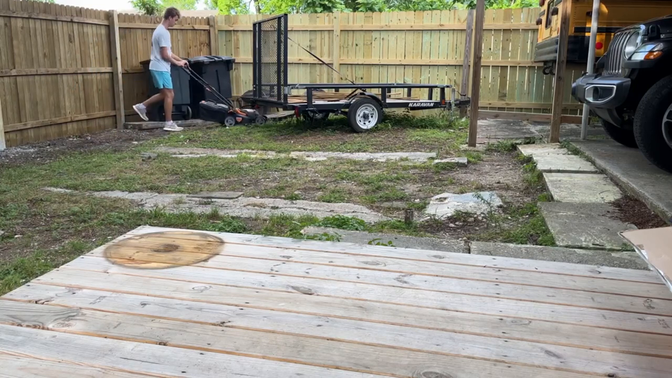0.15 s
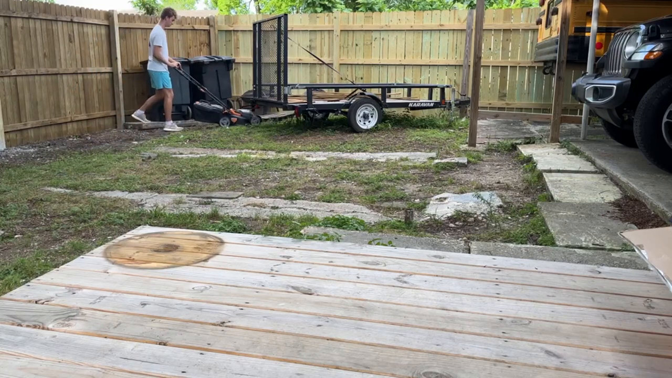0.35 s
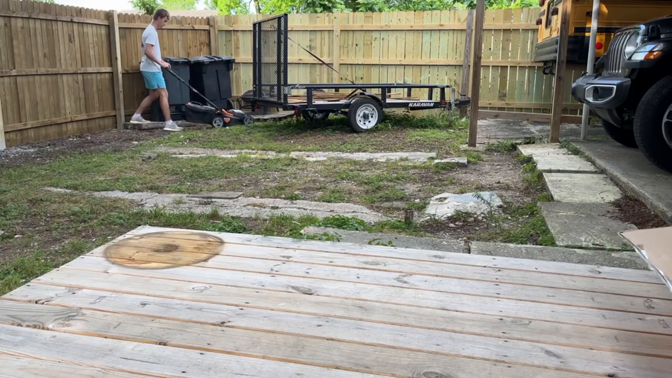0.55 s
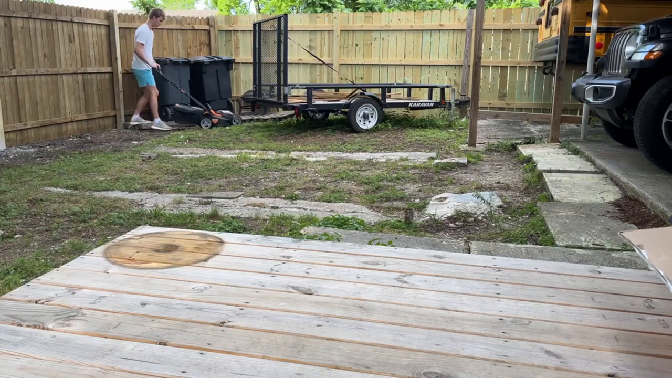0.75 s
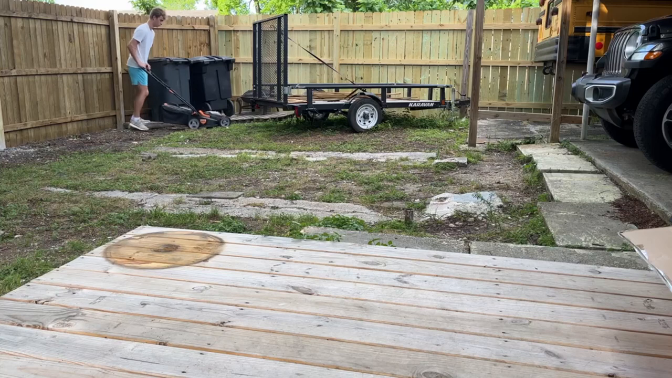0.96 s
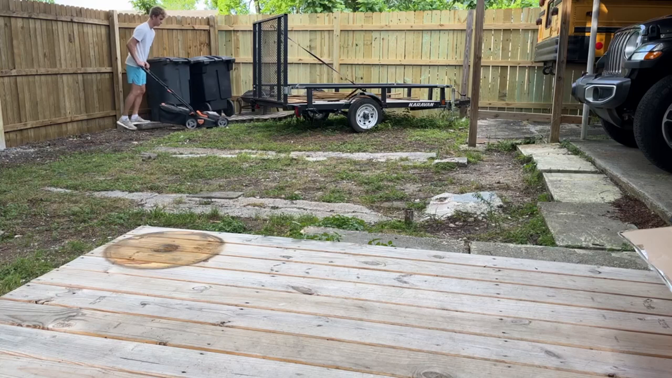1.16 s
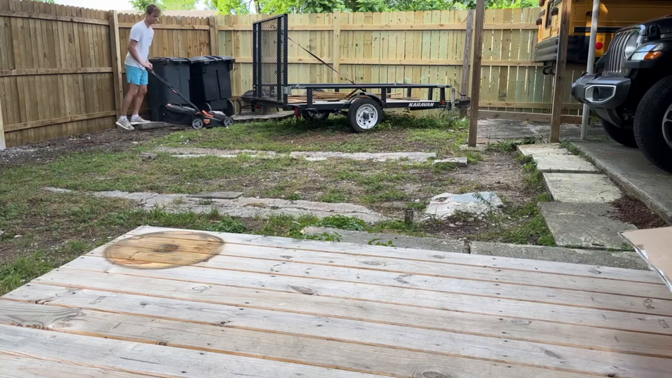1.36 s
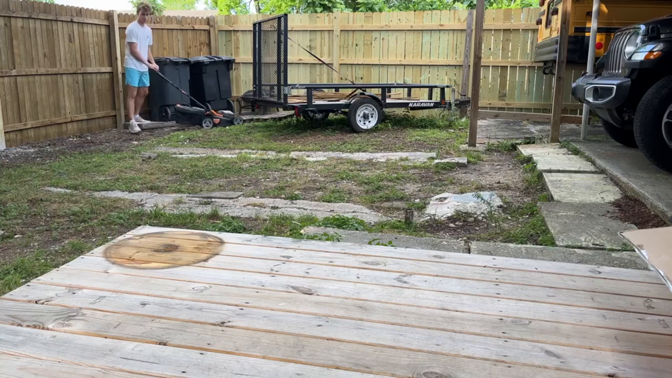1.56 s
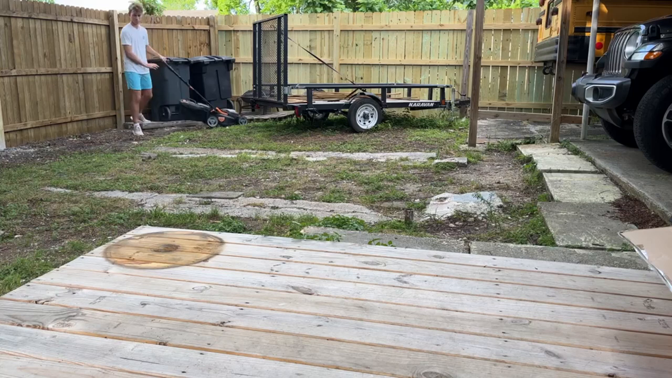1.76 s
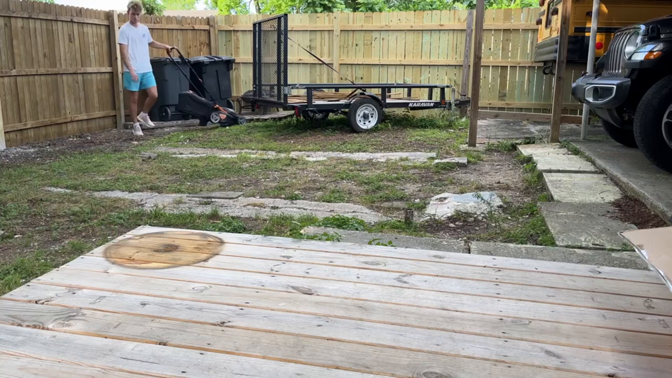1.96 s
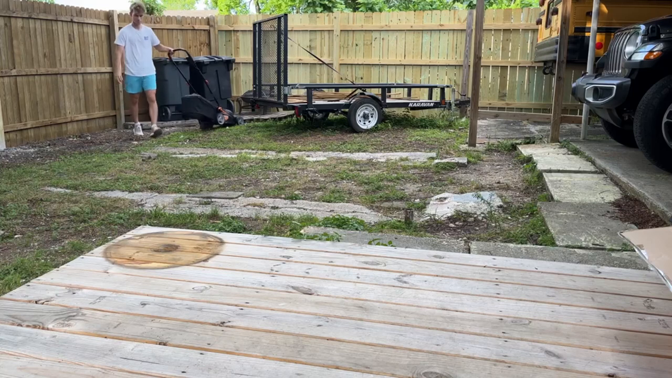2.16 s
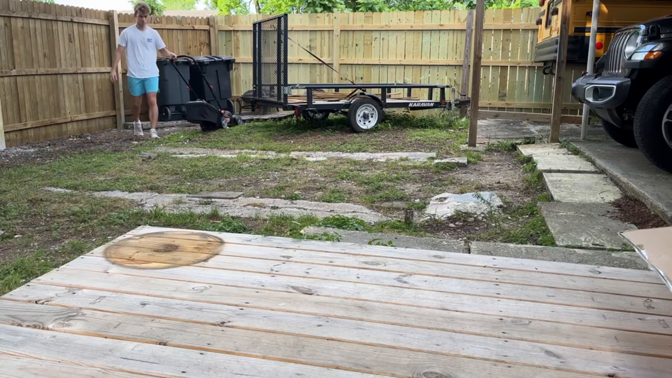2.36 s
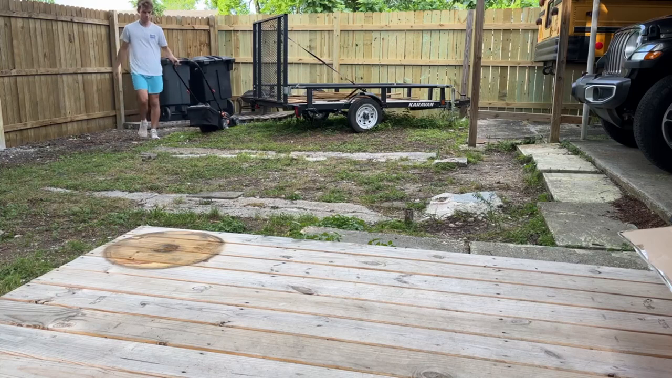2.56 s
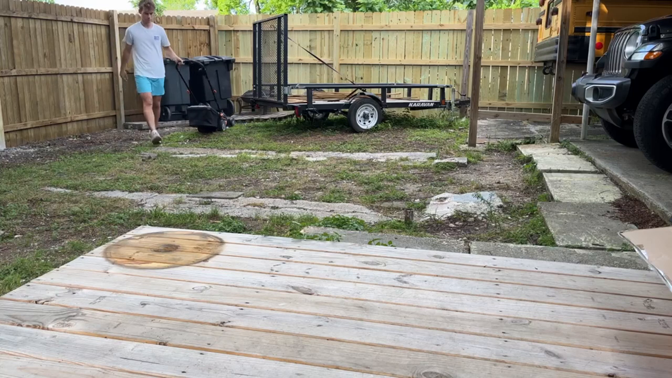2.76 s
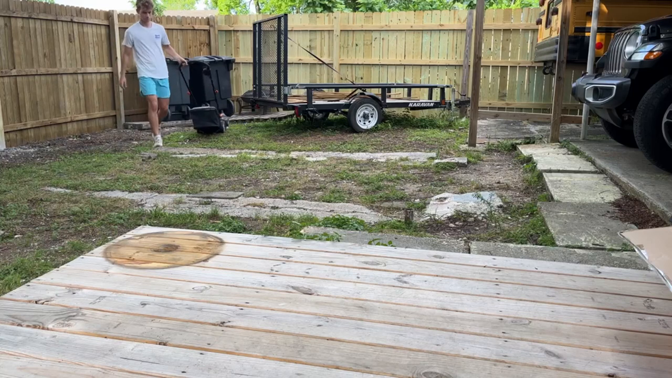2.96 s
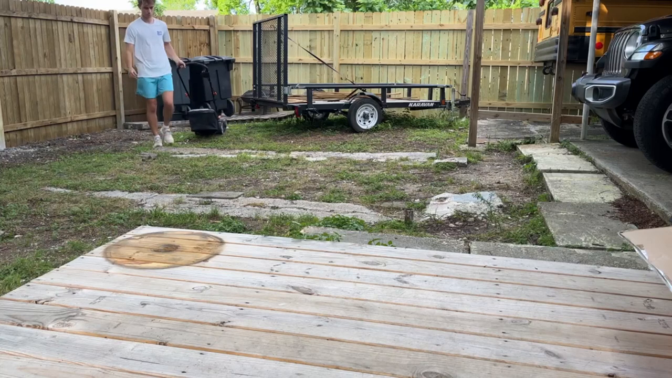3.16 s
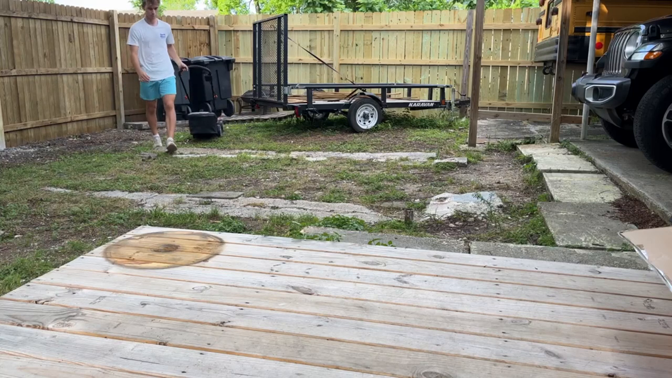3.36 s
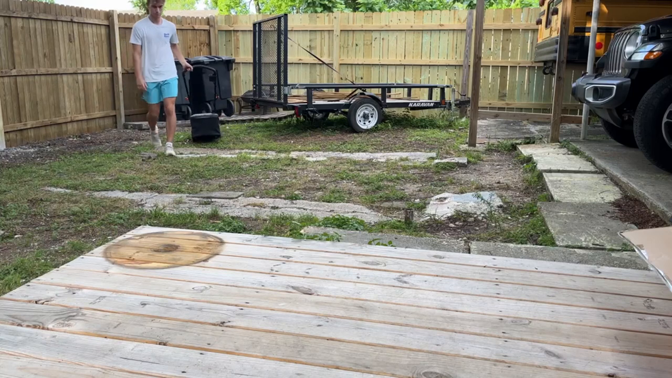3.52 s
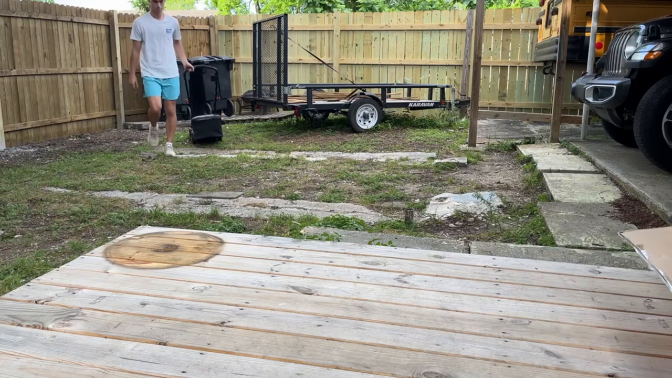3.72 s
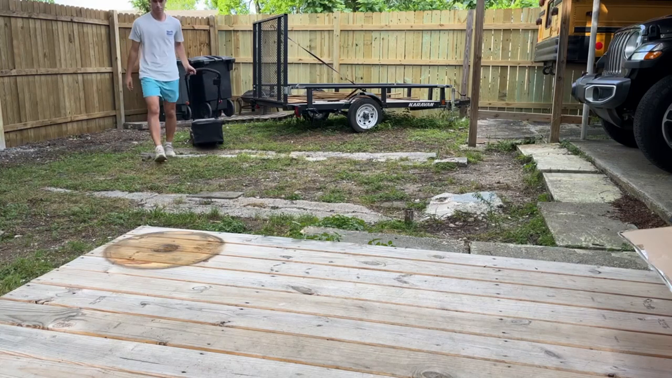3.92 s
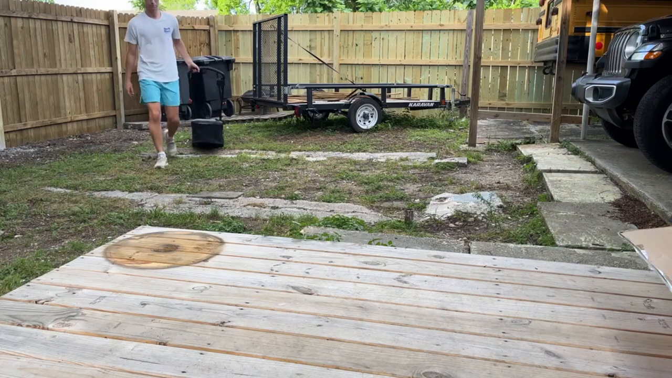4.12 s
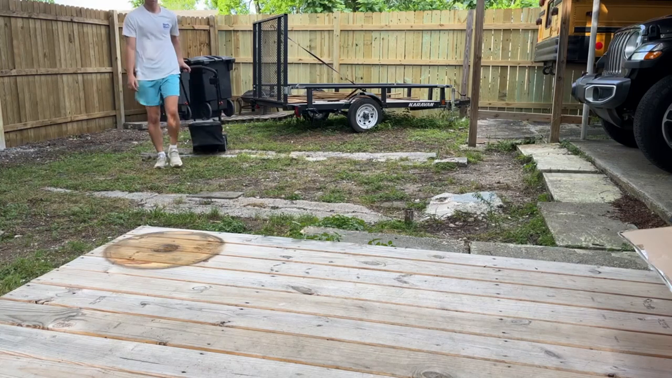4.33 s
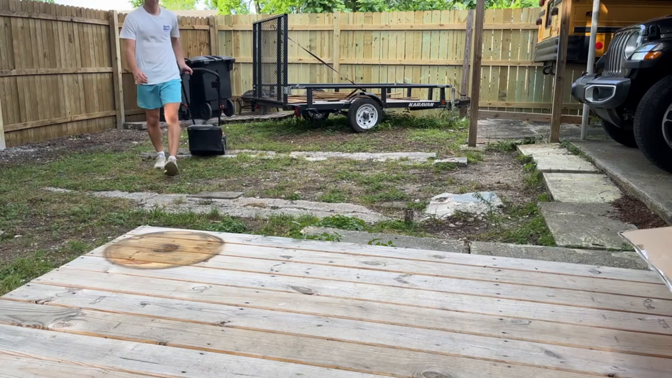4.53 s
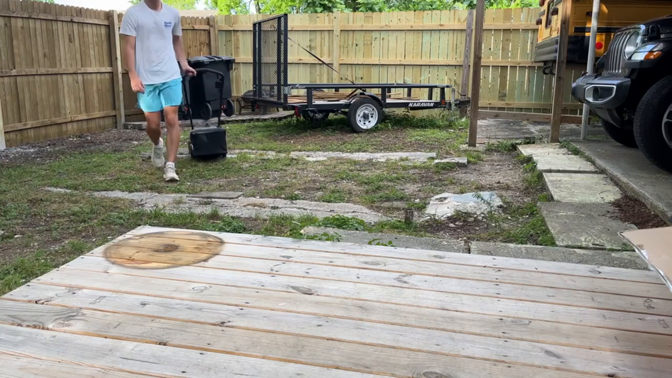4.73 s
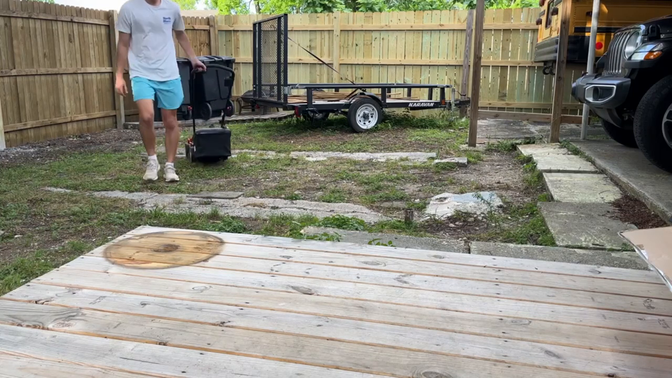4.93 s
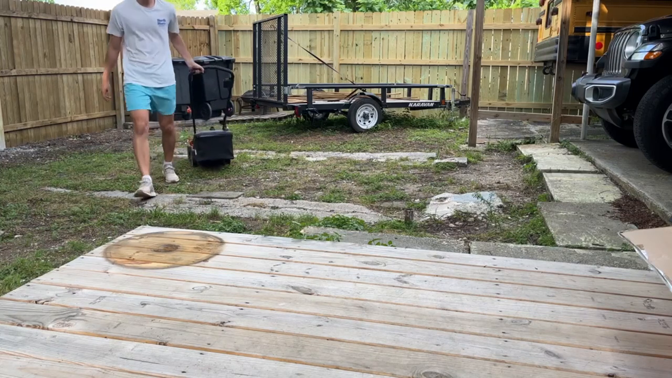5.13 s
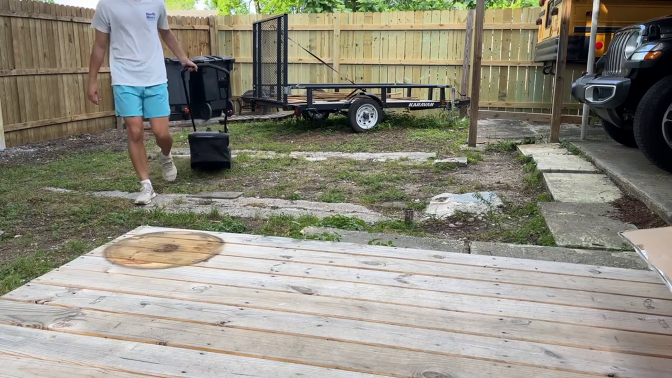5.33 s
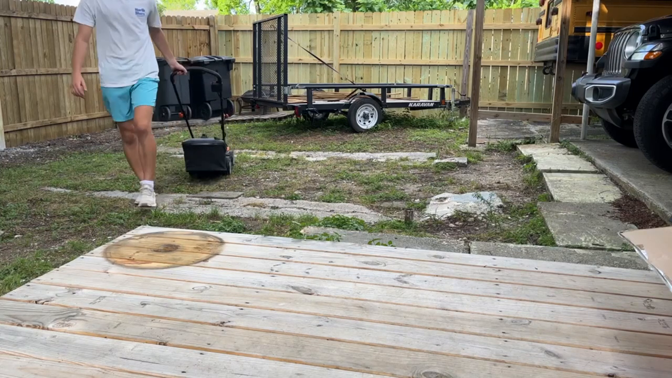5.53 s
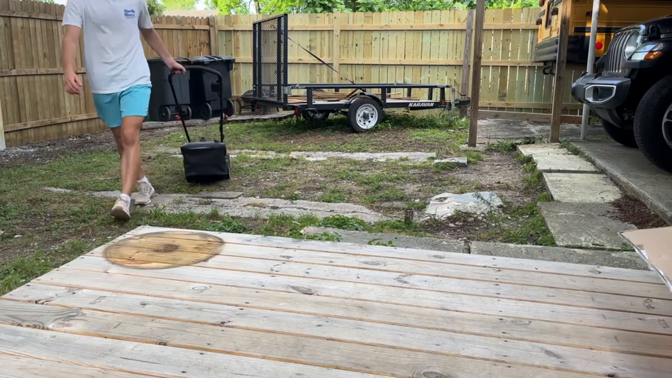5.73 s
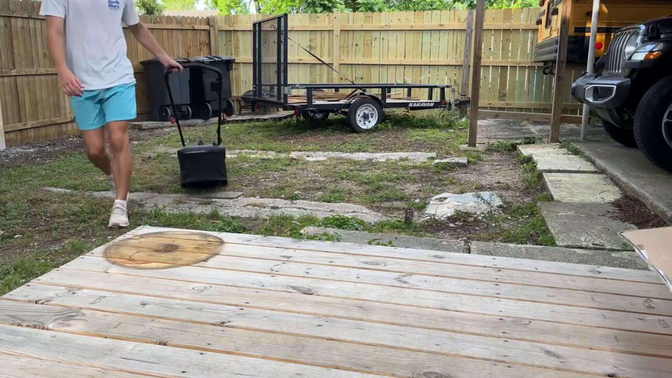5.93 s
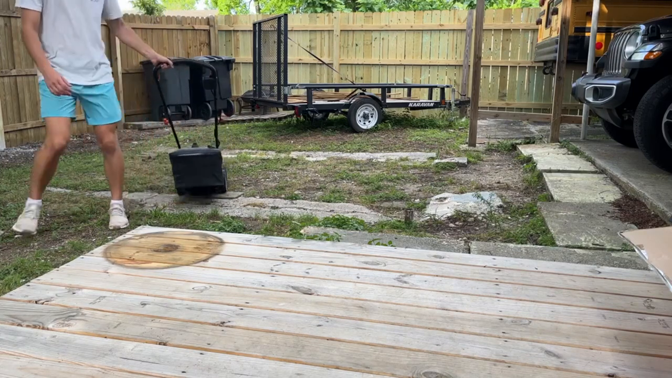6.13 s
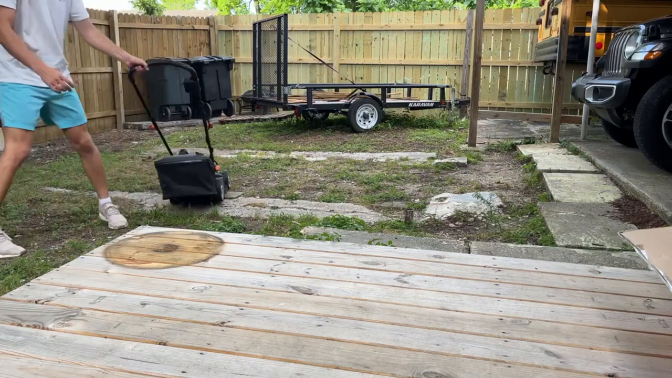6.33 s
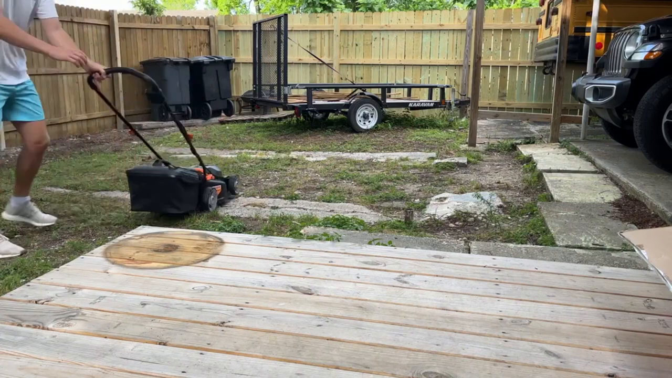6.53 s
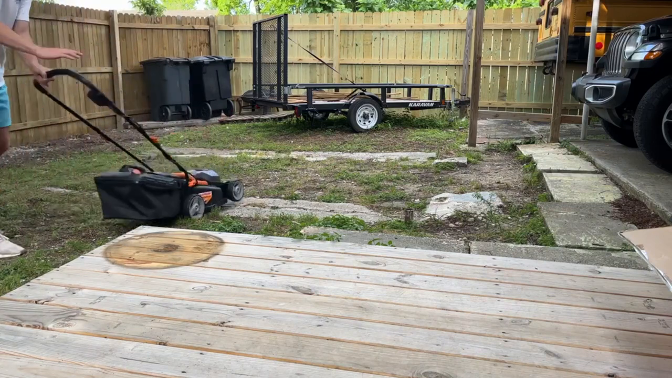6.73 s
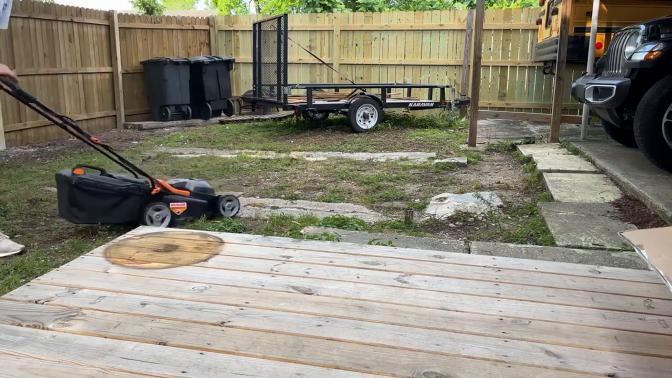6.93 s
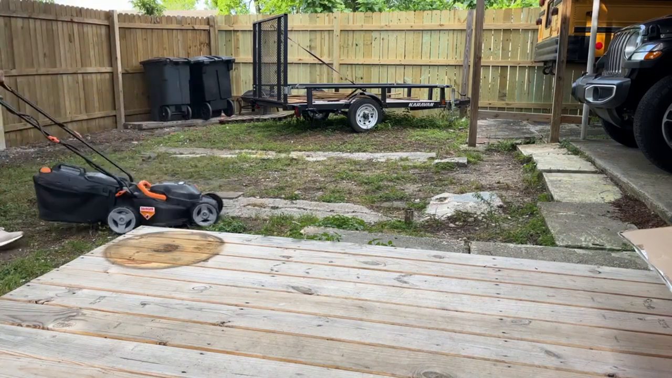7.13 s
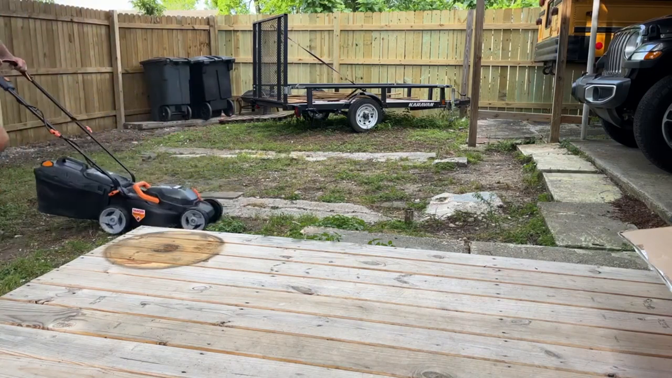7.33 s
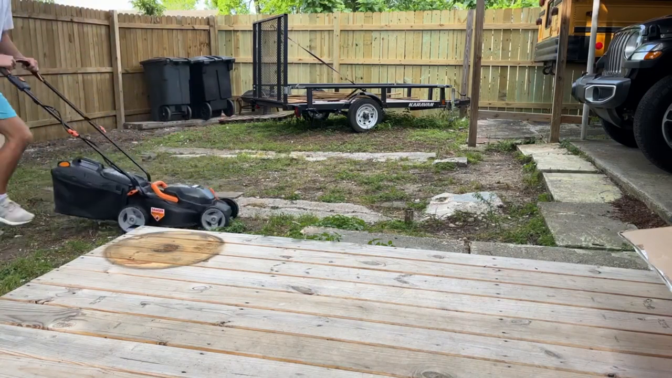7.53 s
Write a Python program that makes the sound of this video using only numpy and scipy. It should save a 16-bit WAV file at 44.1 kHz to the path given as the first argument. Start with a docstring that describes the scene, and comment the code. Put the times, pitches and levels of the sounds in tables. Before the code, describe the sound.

A small electric mower runs in a fenced backyard, heard from a fixed microphone on a deck. Its clean mid-low whine starts faint and distant, swells as it turns and is wheeled nearer, wavering and briefly dipping. Airy roar and fine grass hiss grow with it. Hollow plastic knocks multiply, a hard grit crack marks the closest pass, then loose joints rattle as the motor eases slightly.

```python
"""A motor whines on one clean note as a battery lawn mower is pushed about a fenced yard, far at first, then close.
The blade thrums and stirs the air under the plastic deck: sines at one fixed speed ratio, and coloured noise.
Cut grass hisses, grit and tufts snap, the deck knocks on uneven ground: shaped noise. The whirr swells grainily,
and the handle rattles late on in short notes. Left and right carry the treble at different phases."""
import sys
import numpy as np
from scipy import signal
from scipy.fft import rfft, irfft, next_fast_len
from scipy.io import wavfile
from scipy.ndimage import uniform_filter1d, map_coordinates

SR = 44100
rng = np.random.default_rng(int(sys.argv[2]) if len(sys.argv) > 2 else 0)


def attenuation_scalar(level_db):
    """Turn a level in dB into a linear amplitude multiplier (20 dB per decade)."""
    decades = np.asarray(level_db, float) / 20
    return 10 ** decades


def transcribe(signal):
    """Save signal, clipped to [-1, 1], as a 16-bit WAV file at the path in sys.argv[1]."""
    frames = np.atleast_2d(signal).T
    limited = np.clip(frames, -1, 1)
    pcm = np.round(limited * 32767).astype(np.int16)
    wavfile.write(sys.argv[1], SR, pcm)


N = 334278  # samples

# Levels are those ahead of the stereo image. Spectra give only a shape.
# motor speed, before a slight waver: [t/s, whine f/Hz]
MOTOR_SPEED = [(0, 267.5), (1.1, 267.4), (1.3, 270.2), (2.05, 271.2), (3.67, 271.2), (4.1, 269.2),
               (4.4, 270.2), (6.1, 270.3), (6.3, 268.8), (7.58, 267.3)]
WHINE_CYCLES_PER_BLADE = 2.566  # whine cycles for each blade passage, as if through a gear or belt
# overtones of the motor: [multiple of the whine, relative level/dB]
WHINE_ORDERS = [(1, -0.5), (2, -19)]
# motor note, rising and falling, loudest at 6.4 s: [t/s, level/dB]
WHINE_LEVEL = [(0, -38), (.6, -38.5), (1.82, -41), (2.2, -29.5), (3.67, -31), (4.05, -38), (4.72, -29),
               (5.3, -29.5), (5.72, -27.5), (6.06, -28), (6.4, -24), (7.16, -31), (7.58, -35)]
# faint overtones of the blade: [multiple of the blade passage, rms level/dB]
BLADE_LINES = [(2, -57), (4.08, -54), (6, -53)]
# how far the deck is turned side-on to the microphone: [t/s, share 0-1]
SIDE_ON = [(0, 0.76), (1.9, 0.9), (2.15, 0.88), (2.42, 0), (3.4, 0.04), (3.75, 0.71), (4.47, 0.7),
           (4.8, 0.56), (6.06, 0.65), (6.4, 0.8), (6.72, 0.79), (7, 1)]
THRUM_DB, THRUM_SIDE_DB = -65.5, 25  # end-on; change when side-on
# a note fades for a moment, as if its echo from the fence cancelled it; the sign of a loss is ignored:
# [middle t/s, half width/s, whine loss/dB, thrum loss/dB]
FADES = [(1.08, 0.24, 10, -1), (4.2, 0.074, 1.5, 13), (4.61, 0.097, 0.5, -6), (5, 0.063, 4, 5),
         (5.47, 0.09, 6.5, -1), (6.22, 0.11, 7, 1), (6.5, 0.092, 4, 16)]

# distance: the mower comes nearer, heard in the deck roar: [t/s, level/dB]
NEARNESS = [(0, -41), (1.86, -39), (3.3, -39), (4.05, -35.5), (4.71, -34), (5.34, -33), (6.25, -31),
            (6.48, -28.5), (6.97, -32.5), (7.58, -34)]
# spectrum of the deck roar: [f/Hz, level/dB per Hz]
ROAR_SPECTRUM = [(100, -16), (140, -12.5), (250, -9), (288, 0), (376, -4), (606, -4), (773, -8.5),
                 (1560, -13), (1700, -19.5), (2200, -37)]
# low body of the deck: [f/Hz, level/dB per Hz]
DRONE_SPECTRUM = [(130, -40), (175, -19), (210, 1), (300, -2.5)]
# resonance of the air under the deck: [f/Hz, width/Hz, level/dB]
CAVITY = [(321.2, 18, 0)]
CAVITY_DB = -45  # it sings faintly under the roar
# resonances of the fan housing: [f/Hz, width/Hz, level/dB]
HOUSING = [(1763, 300, 3.1), (2200, 71, 6.2), (2410, 110, 3.8), (2692, 92, 6.8)]
# whirr end-on at mid distance; change when side-on; share of the roar's swing that it follows
WHIRR_DB, WHIRR_SIDE_DB, WHIRR_FOLLOWS = -45, 2, 0.67

# how much grass the blade meets, as fine hiss: [t/s, level/dB]
GRASS_CUT = [(0, -51), (.38, -48.5), (1.46, -53), (2.55, -54), (3.8, -48.5), (4.48, -46), (5.07, -49),
             (6.1, -47.5), (6.46, -40.5), (6.56, -45.5), (6.95, -45), (7.58, -49.5)]
# spectrum of the fine hiss: [f/Hz, level/dB per Hz]
HISS_SPECTRUM = [(5000, -82), (7000, 6.5), (10000, 1.5), (14500, -2), (15400, -45)]
# spectrum of the coarse swish: [f/Hz, level/dB per Hz]
SWISH_SPECTRUM = [(1000, -12), (2800, 2.5), (4500, -4), (6500, -6.5), (8000, -65)]
SWISH_DB, SWISH_WITH_CUT, SWISH_WITH_NEAR = -45.5, 0.57, 0.079  # level; shares of the two swings it follows

# spectrum of wheels and far traffic: [f/Hz, level/dB per Hz]
RUMBLE_SPECTRUM = [(20, -37), (35, -12.5), (58, -2.5), (80, -5), (130, -7), (200, -27)]
RUMBLE_DB = -49.5

# grit cracks on the blade: [start t/s, envelope level/dB]
GRIT = [(.689, -32.5), (.781, -30), (1.434, -34), (1.621, -29), (2.331, -31.5), (2.854, -32),
        (3.254, -34.5), (3.357, -30.5), (4.348, -29), (5.247, -33), (5.606, -31), (5.7, -34), (6.381, -37),
        (6.484, -14.5), (6.867, -29), (7.053, -26), (7.225, -34)]
GRIT_S = 0.009  # time to lose 20 dB
# tufts tear at the blade: [middle t/s, level/dB, half length/s]
TUFTS = [(0.754, -33, 0.017), (0.799, -30, 0.013), (0.834, -36, 0.035), (1.623, -31.5, 0.015),
         (2.977, -43, 0.086), (3.212, -42, 0.049), (4.18, -36.5, 0.045), (4.54, -33.5, 0.081),
         (6.423, -38.5, 0.14), (6.51, -30, 0.016), (7.064, -29, 0.014), (7.096, -33.5, 0.029)]
# spectrum of a crack: [f/Hz, level/dB per Hz]
CRACK_SPECTRUM = [(400, 8), (1800, 0.5), (5000, -3), (15800, -2), (16300, -50)]
TUFT_TOP_HZ = 14700
TEAR_START, TEAR_STOP = 3.5, 1.5  # steepness of the edges: a sudden start, a slower dying

# the deck bumps on the ground: [start t/s, envelope level/dB, time to lose 20 dB/s]
KNOCKS = [(.784, -33, 0.12), (1.617, -28, 0.023), (4.099, -26, 0.081), (4.313, -24, 0.026),
          (4.575, -21.5, 0.027), (4.599, -26.5, 0.057), (4.92, -22.5, 0.02), (5.759, -16, 0.047),
          (5.788, -26, 0.029), (6.123, -28, 0.045), (6.166, -21, 0.045), (6.321, -29, 0.047),
          (6.501, -25, 0.06), (6.552, -23, 0.034), (6.626, -26, 0.038), (7.003, -23, 0.1),
          (7.302, -23.5, 0.045)]
# resonances of the plastic deck: [f/Hz, width/Hz, level/dB]
DECK = [(200, 260, -15), (330, 55, 2), (580, 60, 1.5), (865, 130, -3), (2430, 1740, -23)]
BLOW_S, BLOW_DB = 0.0014, 9  # length of the first contact; its strength over the rattle

# short, grainy swells of the fan whirr and the band near 5 kHz: [middle t/s, peak rms level/dB, half length/s]
WHIRR_SWELLS = [(1.22, -41, 0.094), (2.197, -38.5, 0.035), (3.56, -45.5, 0.31), (5.276, -37, 0.04),
                (6.647, -34.5, 0.24), (7.267, -37, 0.11)]
# spectrum of these swells: [f/Hz, level/dB per Hz]
SWELL_SPECTRUM = [(1300, -6), (1800, -2), (2700, -0.5), (3600, -13.5), (5000, -11), (6500, -18),
                  (7500, -48)]

# the handle's loose joints ring while the mower is swung round:
# [start t/s, envelope level/dB, f/Hz, time to lose 20 dB/s]
RATTLES = [(6.629, -31, 2730, .12), (6.699, -29, 2200, .14), (6.7, -42, 5030, .2), (6.82, -30, 2130, .08),
           (6.879, -29, 2090, .14), (7.23, -42, 5000, .2), (7.265, -34, 2300, .09)]
RATTLE_WAVER = 0.015  # share of the pitch

# stereo likeness, phase lead and balance of the sound by pitch:
# [f/Hz, likeness 0-1, half turns by which right leads, left over right/dB]
STEREO_IMAGE = [(60, .97, 0, .4), (300, .9, .03, .1), (600, .55, 0, 1.5), (1000, .15, 0, 2.5),
                (1500, .45, -.92, .1), (1800, .85, -.1, 1.6), (2700, .7, -.32, 2.2), (3900, .15, -.48, 3),
                (4700, .4, -.16, 4.5), (5600, .3, .35, 3.5), (6800, .6, .54, .5), (7750, 1, 1, 0),
                (8850, 1, 1, 0), (9300, .8, 1.35, 0), (10400, .8, 1.6, 0), (11100, 1, 2, 0),
                (12700, 1, 2, 0), (13100, .8, 2.3, 0), (14000, .8, 2.65, 0), (14600, 1, 3, 0)]


def unit(x):
    """Scaled to rms 1."""
    return x / np.sqrt(np.mean(x ** 2) + 1e-20)


def curves(rows):
    """One value per sample for each column after the time."""
    s, *cols = np.transpose(rows)
    return [np.interp(np.arange(N) / SR, s, c) for c in cols]


def slow(shape, size=16):
    """A smooth function of time, held over short steps of samples."""
    return np.repeat(shape(np.arange(0, N, size) / SR), size, axis=-1)[..., :N]


def wobble(rate):
    """A smooth random curve, rate knots a second."""
    knots = rng.standard_normal(int(N * rate / SR) + 4)
    return map_coordinates(knots, [np.arange(N) * rate / SR])


def filtered(x, response):
    """x passed through a complex response of frequency."""
    m = next_fast_len(N + 8192)
    return irfft(rfft(x, m) * response(np.fft.rfftfreq(m, 1 / SR)), m)[..., :N]


def colour(points):
    """Gain read from (f/Hz, level/dB) points, silent outside them."""
    f, db = np.transpose(points)
    return lambda hz: attenuation_scalar(np.interp(np.log(hz + 1), np.log(f + 1), db, -120, -120))


def modes(rows):
    """Causal response of a set of resonances, added with alternating sign."""
    def response(f):
        return sum((-1) ** k * attenuation_scalar(db) * 1j * f * width / (centre ** 2 - f * f + 1j * f * width)
                   for k, (centre, width, db) in enumerate(rows))
    return response


def rush(patchy_db):
    """Two unrelated noises (direct, scattered) that share patches of random gain."""
    z = signal.stft(rng.standard_normal((2, N)), nperseg=512)[2]
    field = uniform_filter1d(rng.standard_normal(z.shape[1:]), size=5, axis=0)  # across frequency
    field = uniform_filter1d(field, size=10, axis=1)  # across time
    return signal.istft(z * attenuation_scalar(patchy_db * unit(field)), nperseg=512)[1][:, :N]


def bursts(events, rise):
    """Envelope of hits that lose 20 dB over their length and rise over a share of it."""
    envelope, t = np.zeros(N + SR), np.arange(SR // 2) / SR
    for s, db, length in events:
        hit = attenuation_scalar(db - 20 * t / length) * (1 - np.exp(-t / (rise * length)))
        envelope[round(s * SR):][:len(t)] += hit
    return envelope[:N]


def fades():
    """Loss in dB of whine and thrum around the moments when each fades."""
    return slow(lambda t: sum(np.exp(-((t - s) / width) ** 2) * np.abs(loss)[:, None]
                              for s, width, *loss in FADES))


def notes():
    """Whine and thrum keep one fixed speed ratio, as if through a gear or belt; thrum leaves the deck's side."""
    whine_hz = curves(MOTOR_SPEED)[0] + 0.43 * wobble(12)
    phase = 2 * np.pi * np.cumsum(whine_hz) / SR
    blade_phase = phase / WHINE_CYCLES_PER_BLADE
    (whine_db,), (side,) = curves(WHINE_LEVEL), curves(SIDE_ON)
    whine_loss, thrum_loss = fades()
    whine_db = whine_db - whine_loss
    thrum_db = THRUM_DB + THRUM_SIDE_DB * side - thrum_loss
    late = np.array([[0], [np.pi / 2]])  # the scattered part lags a quarter cycle
    whine = sum(attenuation_scalar(whine_db + db + 1.4 * wobble(14)) * np.sin(k * phase - late) for k, db in WHINE_ORDERS)
    thrum = attenuation_scalar(thrum_db) * np.sin(blade_phase - late)
    lines = sum(attenuation_scalar(db + 5.3 * wobble(3.11)) * np.sin(k * blade_phase - late) for k, db in BLADE_LINES)
    return np.sqrt(2) * (whine + thrum + lines)  # sine levels are rms


def air():
    """Noise for the roar under the deck, its low body and cavity, and the whirr of the fan in its housing."""
    (roar_db,), (side,) = curves(NEARNESS), curves(SIDE_ON)
    whirr_db = WHIRR_DB + WHIRR_SIDE_DB * side + WHIRR_FOLLOWS * (roar_db - roar_db.mean())
    whirr_db = whirr_db + 0.5 * wobble(13)  # it flutters
    drone_db = -50.5 + 2.45 * (roar_db + 34.5)  # the low body carries only at close range
    cavity, housing = modes(CAVITY), modes(HOUSING)

    def fan(f):
        """The housing, with lows and highs rolled off."""
        return housing(f) / (1 + (1400 / (f + 1)) ** 4) / (1 + (f / 6000) ** 4)

    roar = unit(filtered(rush(patchy_db=2.0), colour(ROAR_SPECTRUM)))
    song = unit(filtered(rush(patchy_db=1.5), lambda f: cavity(f) ** 2))
    whirr = unit(filtered(rush(patchy_db=3.0), fan))
    drone = unit(filtered(rush(patchy_db=0.5), colour(DRONE_SPECTRUM)))
    waver_db = 0.76 * wobble(14)  # the roar, whirr and low body waver unevenly together
    blown = attenuation_scalar(roar_db) * roar + attenuation_scalar(whirr_db) * whirr + attenuation_scalar(drone_db) * drone
    return attenuation_scalar(waver_db) * blown + attenuation_scalar(CAVITY_DB) * song


def grass():
    """Clippings come in clumps with sparse ticks: a fine hiss over a coarser swish."""
    (hiss_db,), (roar_db,) = curves(GRASS_CUT), curves(NEARNESS)
    cut_swing, near_swing = hiss_db - hiss_db.mean(), roar_db - roar_db.mean()
    swish_db = SWISH_DB + SWISH_WITH_CUT * cut_swing + SWISH_WITH_NEAR * near_swing
    tick_db = np.minimum(4.5 * rng.exponential(size=N), 13)
    ticks = (rng.random(N) < 160 / SR) * attenuation_scalar(tick_db)  # about 160 a second
    spray = np.convolve(ticks, np.exp(-np.arange(200) / 45))[:N]  # each dies away in about 1 ms
    clumps = rush(patchy_db=1.2) * (1 + .42 * spray) * attenuation_scalar(.8 * wobble(25) + 1.3 * wobble(7))
    hiss = unit(filtered(clumps, colour(HISS_SPECTRUM)))
    swish = unit(filtered(clumps, colour(SWISH_SPECTRUM)))
    return attenuation_scalar(hiss_db) * hiss + attenuation_scalar(swish_db) * swish


def rumble():
    """Wheels and far traffic: low coloured noise."""
    return attenuation_scalar(RUMBLE_DB) * unit(filtered(rush(patchy_db=2.0), colour(RUMBLE_SPECTRUM)))


def snaps():
    """Grit cracks against the blade; tufts tear there as a duller crackle, uneven by the millisecond."""
    crack = unit(filtered(rng.standard_normal((2, N)) * attenuation_scalar(1.24 * wobble(300)), colour(CRACK_SPECTRUM)))
    grit = bursts([(s, db, GRIT_S) for s, db in GRIT], rise=0.02) * crack

    def edge(u):
        """Swell of one tear, u half lengths from its middle."""
        return np.exp(-np.abs(u) ** np.where(u < 0, TEAR_START, TEAR_STOP))

    tearing = slow(lambda t: sum(attenuation_scalar(db) * edge((t - s) / half) for s, db, half in TUFTS))
    tearing = tearing * unit(attenuation_scalar(2.4 * wobble(320)))
    tufts = filtered(tearing * crack, lambda f: 1 / (1 + (f / TUFT_TOP_HZ) ** 40))
    return grit, tufts


def knocks():
    """Each bump is one firm push and a short rattle through the resonances of the deck."""
    noise = rng.standard_normal((2, N))
    deck = modes(DECK)
    scale = np.std(filtered(noise, deck))
    push = bursts([(s, db + BLOW_DB, BLOW_S) for s, db, length in KNOCKS], rise=0.53)
    rattle = noise * bursts(KNOCKS, rise=0.048)
    return filtered(rattle + [[1], [.3]] * push, deck) / scale  # the push is mostly direct


def whirr_swells():
    """Short, grainy swells of the fan whirr and the band near 5 kHz, made of coloured noise."""
    swell = slow(lambda t: sum(attenuation_scalar(db) * np.exp(-((t - s) / half) ** 2) for s, db, half in WHIRR_SWELLS))
    grainy = rush(patchy_db=1.2) * attenuation_scalar(2.5 * wobble(90))
    return swell * unit(filtered(grainy, colour(SWELL_SPECTRUM)))


def rattles():
    """Each buzz of a loose joint is a wavering, grainy note; the scattered part leads a quarter cycle."""
    turns = 2 * np.pi * np.cumsum(1 + RATTLE_WAVER * wobble(70)) / SR  # phase of a 1 Hz note
    grain = unit(attenuation_scalar(3.5 * wobble(120)))
    sound = np.zeros((2, N))
    for s, db, hz, length in RATTLES:
        near = slice(round(s * SR), round(s * SR) + SR // 2)
        note = np.array([np.sin(hz * turns[near]), np.cos(hz * turns[near])])
        sound[:, near] += bursts([(s, db, length)], rise=0.1)[near] * note
    return grain * sound


def stereo_image(sound, most_alike):
    """(direct, scattered) to (left, right), with likeness, phase lead and balance set by pitch."""
    hz, alike, lead, tilt_db = np.transpose(STEREO_IMAGE)

    def blend(f):
        """Likeness as an angle between direct and scattered sound."""
        angle = np.arccos(np.clip(np.interp(f, hz, alike), 0, most_alike)) / 2
        return np.array([np.cos(angle), np.sin(angle)])

    def sides(f):
        """Half the balance and half the phase to each channel, in opposite directions."""
        left = attenuation_scalar(np.interp(f, hz, tilt_db) / 2) * np.exp(-.5j * np.pi * np.interp(f, hz, lead))
        return np.array([left, 1 / left])

    shared, apart = filtered(sound, blend)
    return filtered(np.array([shared + apart, shared - apart]), sides)


def scene():
    """The yard in stereo; the sharp cracks sound wider and less alike in the two channels than the tufts."""
    grit, tufts = snaps()
    steady = notes() + air() + grass() + rumble() + knocks() + whirr_swells() + rattles()
    image = stereo_image(steady, most_alike=1)
    return image + stereo_image(tufts, most_alike=.993) + stereo_image(grit, most_alike=.8)


def low_pass(x):
    """Removes everything above the highest recorded frequency."""
    return signal.sosfilt(signal.butter(12, 16520, fs=SR, output="sos"), x)


def record(dry):
    """The finished mix as it is stored."""
    return low_pass(dry)


dry = scene()
out = record(dry)
transcribe(out)
```